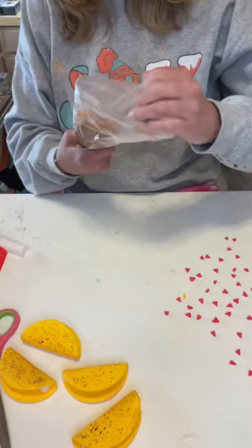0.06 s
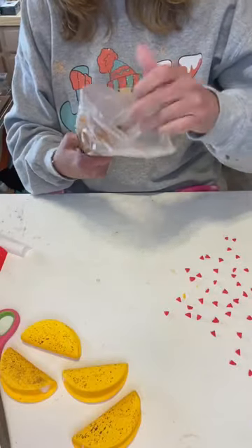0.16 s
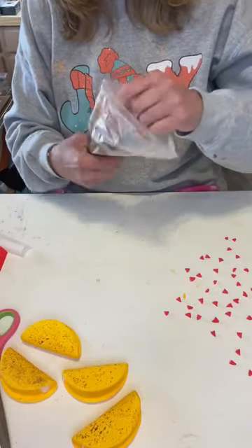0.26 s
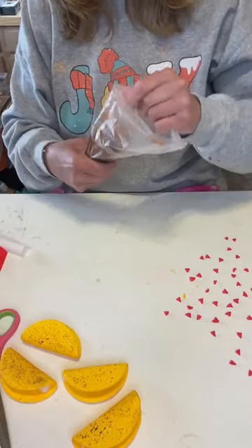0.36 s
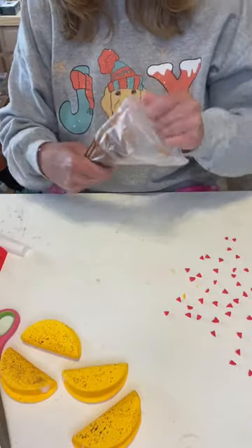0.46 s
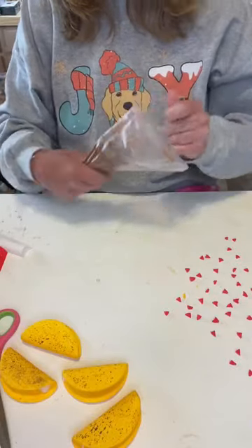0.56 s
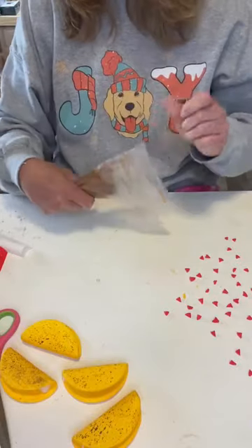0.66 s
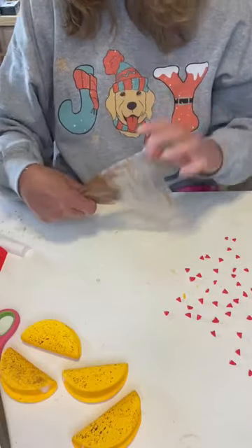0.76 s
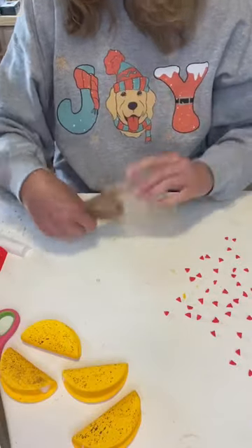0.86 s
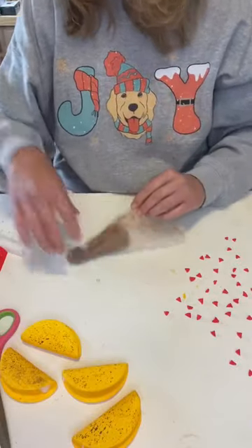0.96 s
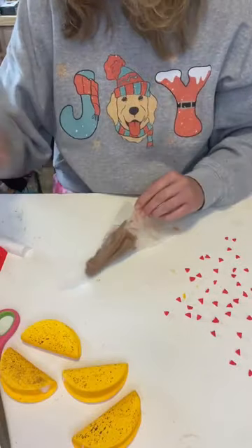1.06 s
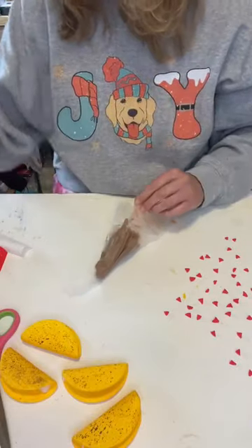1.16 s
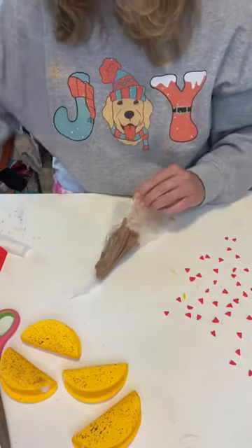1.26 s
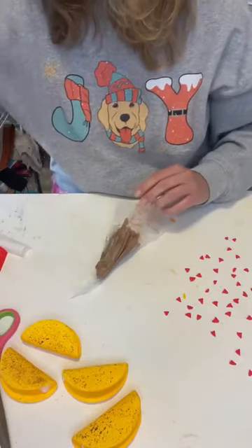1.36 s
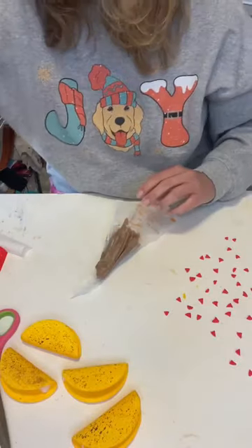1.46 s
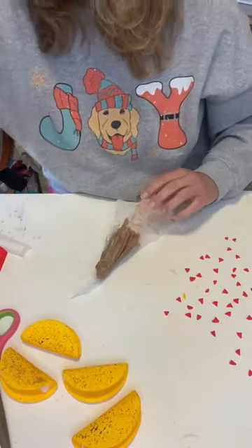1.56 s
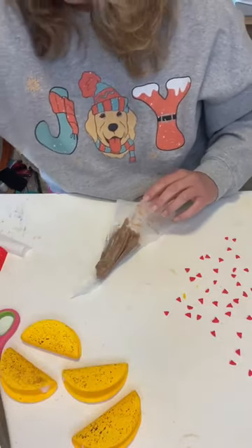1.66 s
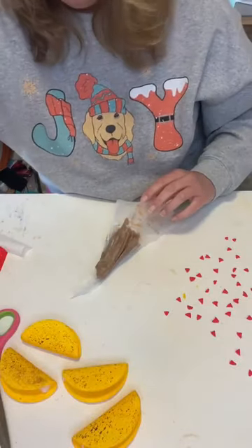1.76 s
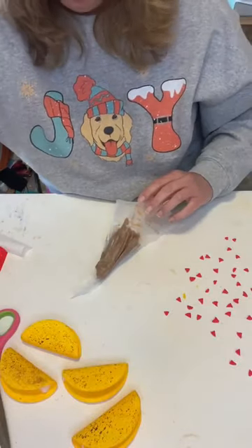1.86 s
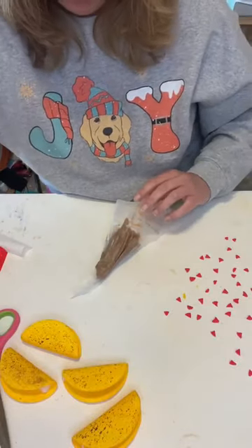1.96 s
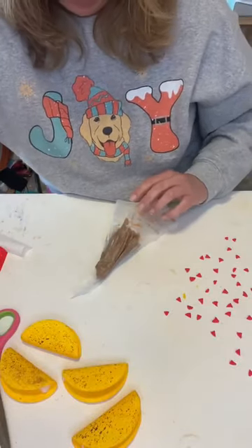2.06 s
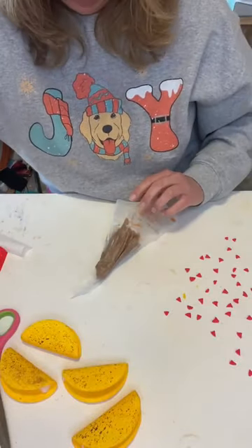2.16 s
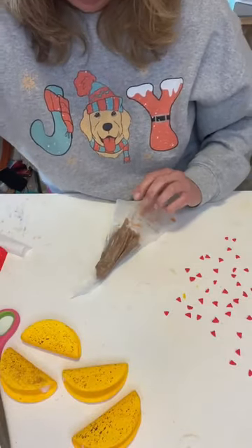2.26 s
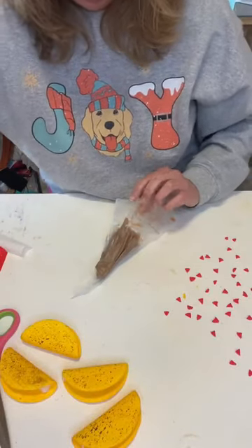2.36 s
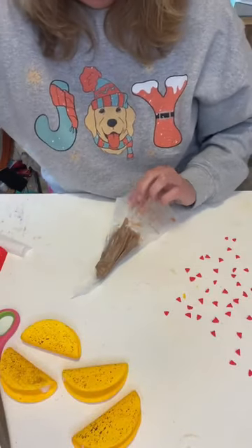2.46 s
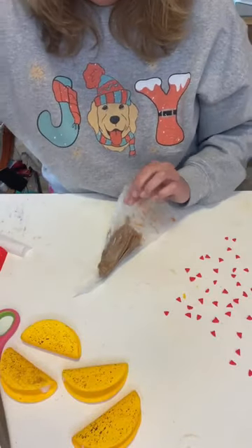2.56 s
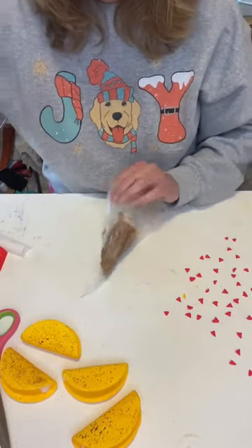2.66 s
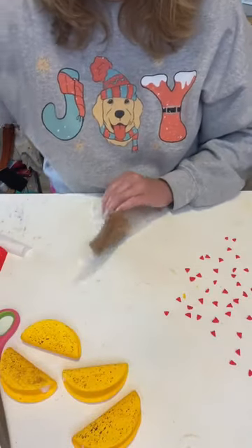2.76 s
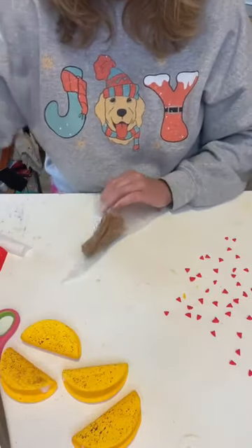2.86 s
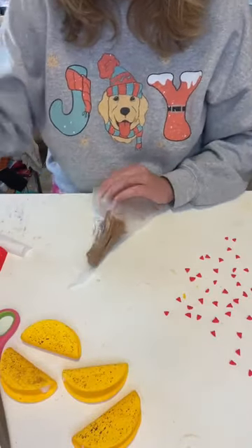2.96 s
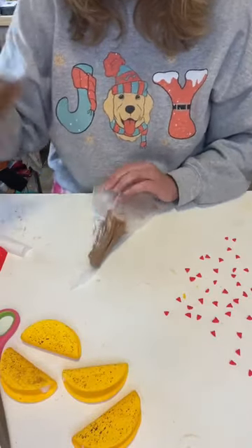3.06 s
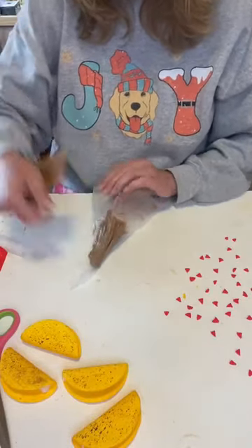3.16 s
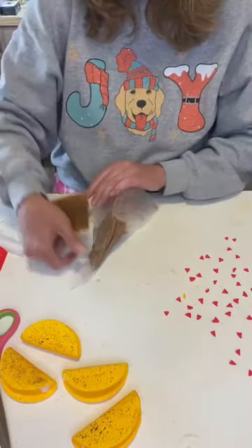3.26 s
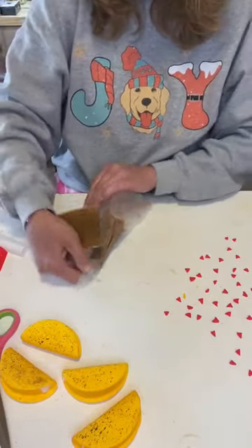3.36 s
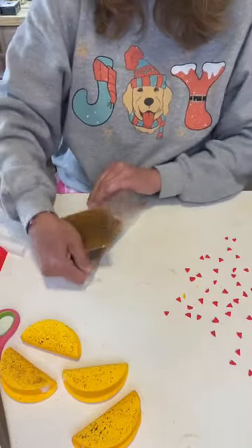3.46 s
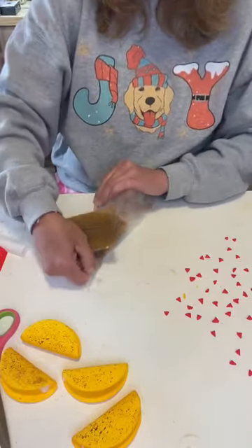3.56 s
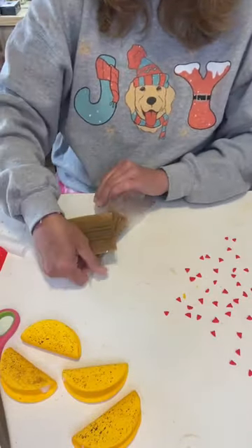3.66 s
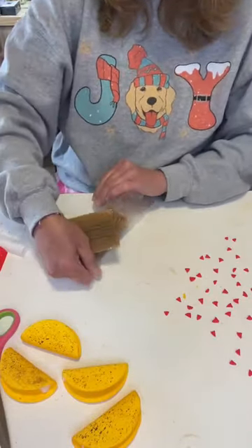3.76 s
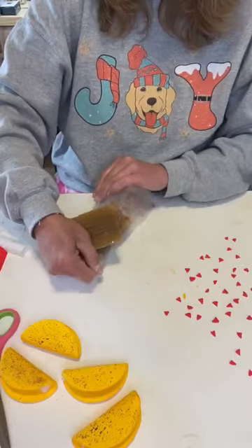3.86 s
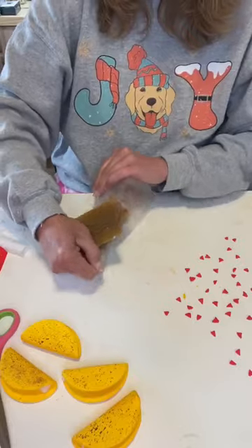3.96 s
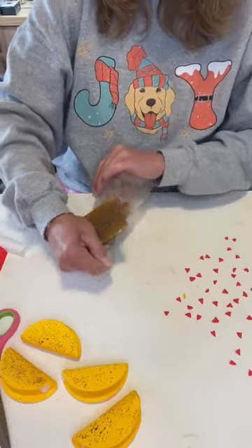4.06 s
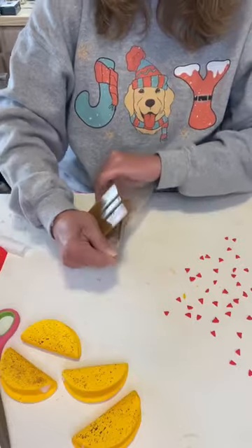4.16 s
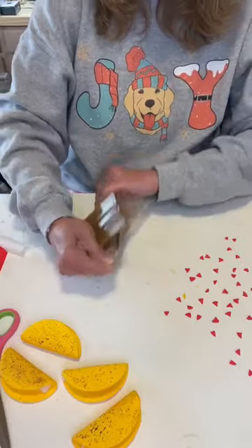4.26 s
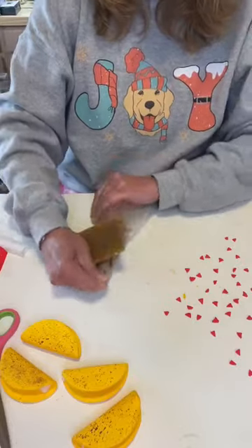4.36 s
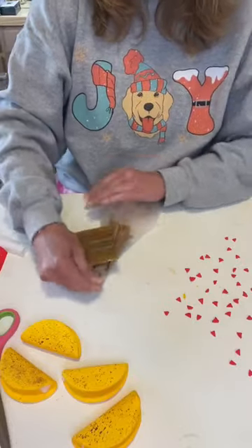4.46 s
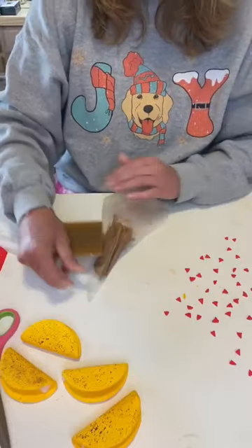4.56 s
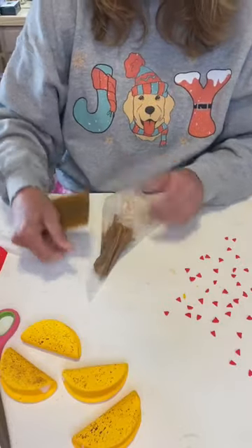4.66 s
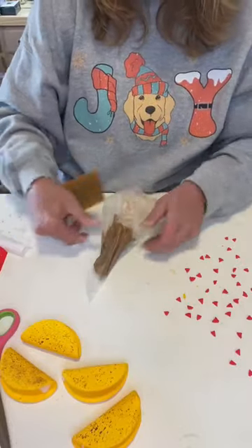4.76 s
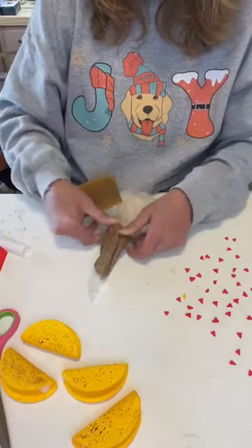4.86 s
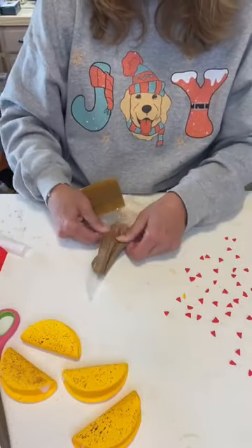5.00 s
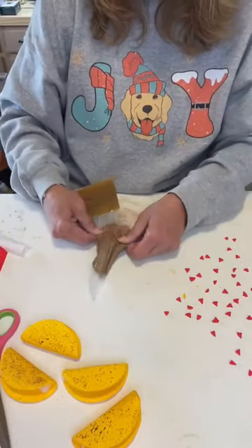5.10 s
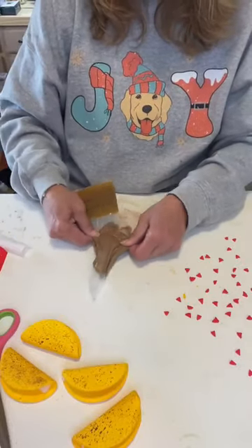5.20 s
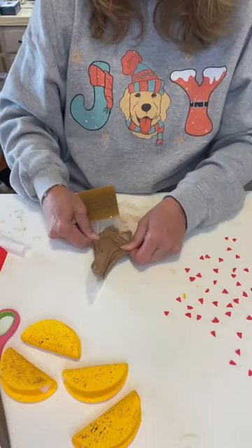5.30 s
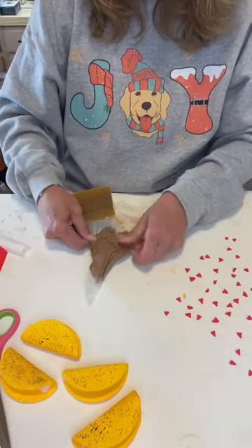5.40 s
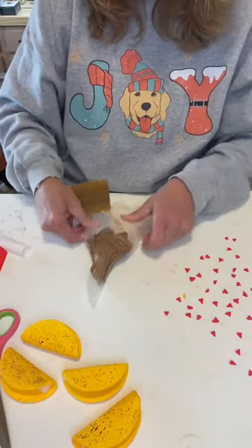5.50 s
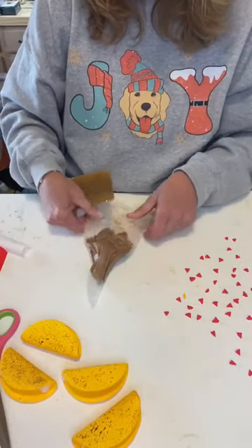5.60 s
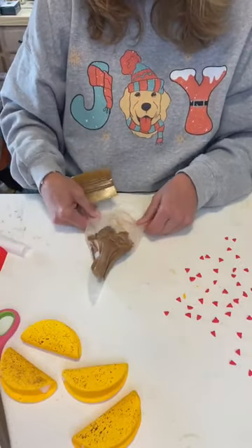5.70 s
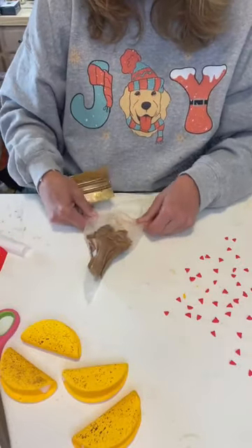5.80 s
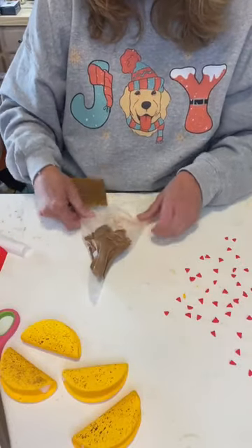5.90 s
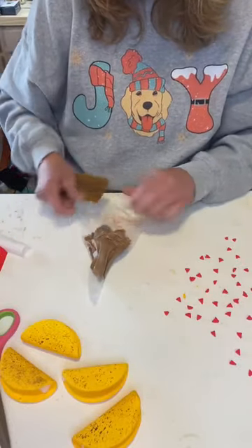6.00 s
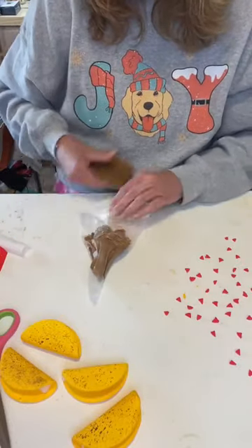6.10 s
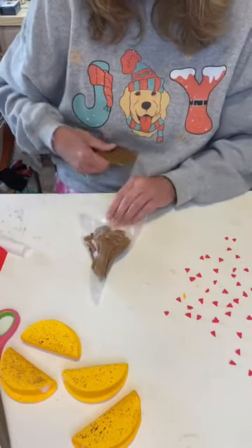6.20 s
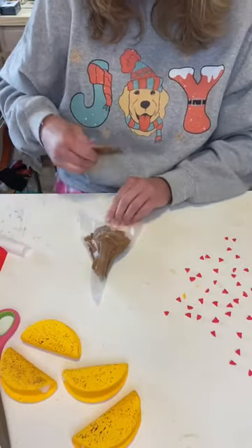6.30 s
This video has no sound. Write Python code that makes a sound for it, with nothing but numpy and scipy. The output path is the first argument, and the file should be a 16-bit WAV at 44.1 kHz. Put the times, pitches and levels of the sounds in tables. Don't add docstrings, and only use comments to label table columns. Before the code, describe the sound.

Crisp plastic film crinkles over a craft table, recorded near and dry by a phone. Busy rustling and popping folds come first, then a brief lull with tiny crackles, then a few sudden snaps. Pressing strokes follow, with rougher crackle and dull thumps on the table top, then more tugging and rustling that fades. Stiff edges tick high; hands rub softly underneath; the quiet room adds only a faint hush.

```python
import sys
import numpy as np
from scipy import signal
from scipy.fft import rfft, irfft, next_fast_len
from scipy.io import wavfile
from scipy.ndimage import uniform_filter1d

SR = 44100
rng = np.random.default_rng(int(sys.argv[2]) if len(sys.argv) > 2 else 0)


def store_wav(level_fs):
    pcm = np.round(np.clip(np.atleast_2d(level_fs), -1, 1) * 32767)
    wavfile.write(sys.argv[1], SR, pcm.T.astype(np.int16))


def nominal_scale(level):
    x = np.asarray(level, float) / 20
    return 10 ** x


N = 279594


def at_hz(points, hz):
    points = np.array(points)
    return np.interp(np.log(hz), np.log(points[:, 0]), points[:, 1])


def in_time(rows):
    s, *columns = np.transpose(rows)
    return [np.interp(np.arange(N) / SR, s, column) for column in columns]


def rms_one(x):
    return x / np.sqrt(np.mean(x ** 2) + 1e-20)


def drift(rate):
    r = np.exp(-80 * np.pi * rate / SR)
    noise = rng.standard_normal(N // 40 + 2002)
    slow = signal.lfilter([1], [1, -2 * r, r * r], noise)[2000:]
    return np.interp(np.arange(N) / 40, np.arange(len(slow)), rms_one(slow))


def ring(clicks, hz, t60):
    r, w = nominal_scale(-60 / (t60 * SR)), 2 * np.pi * hz / SR
    return signal.lfilter([0, np.sin(w)], [1, -2 * r * np.cos(w), r * r], clicks + 1e-18)


def colour(x, gain):
    size = next_fast_len(N)
    hz = np.maximum(np.arange(size // 2 + 1) * SR / size, 1)
    return irfft(rfft(x, size) * gain(hz), size)[..., :N]


# f/Hz, level/dB [dB per Hz]
ROOM_SPECTRUM = [(30, -17), (60, 2.5), (130, -8.5), (300, -0.5), (600, -9.5), (1000, -18), (1600, -8),
                 (2400, -9), (3500, -29), (6000, -25), (13500, -34.5)]


def room_tone():
    level = nominal_scale(-75.5 + 2.6 * drift(14))
    noise = rng.standard_normal(N)
    return level * rms_one(colour(noise, lambda hz: nominal_scale(at_hz(ROOM_SPECTRUM, hz))))


# t/s, peak level/dB, extra level of the upper modes/dB
BUMPS = [(0.066, -53, 0.1), (0.447, -60, -1), (1.09, -56, -2), (1.134, -60, 7), (2.667, -72, 4),
         (3.48, -56, 7.5), (3.499, -51.5, 5.5), (4.471, -38, 1), (4.481, -31.5, -9), (4.973, -58, -2),
         (5.373, -38.5, -9.5), (5.868, -43.5, -13), (6.061, -59, -6), (6.314, -50, 0.5)]
# f/Hz, level/dB, t60/s
TABLE_MODES = [
    (74.2, 2.5, 0.16),
    (134.7, 12.5, 0.11),
    (165, 1.5, 0.17),
    (233, -3.5, .06),
    (380, -20.5, 0.076),
]
# t/s, level/dB
RUBBING = [(0.0, -63), (0.25, -55), (0.42, -66), (0.58, -55), (0.95, -76), (1.3, -63), (1.7, -76),
           (1.95, -66), (2.15, -78), (2.4, -58), (2.95, -78), (3.13, -64), (3.3, -80), (3.9, -66),
           (4.6, -64), (5.2, -82), (5.5, -57), (6.34, -72)]


def table(contact_s, rub_db):
    s, db, upper_db = np.transpose(BUMPS)
    rub = nominal_scale(in_time(RUBBING)[0] + 1.5 * drift(6.8))
    push = np.hanning(int(contact_s * SR))
    push = push / push.sum()
    bumps, rubbing = np.zeros(N), 0
    for hz, mode_db, t60 in TABLE_MODES:
        clicks = np.zeros(N)
        clicks[(s * SR).astype(int)] = nominal_scale(db + mode_db - 7 + upper_db * (hz > 100))
        bumps += ring(np.convolve(clicks, push)[:N], hz, t60)
        rubbing = rubbing + nominal_scale(mode_db) * rms_one(ring(rng.standard_normal(N), hz, t60 / 3))
    return bumps + nominal_scale(rub_db) * rub * rms_one(rubbing)


def echoes(x, t60, gap_s):
    t = np.arange(SR // 2) / SR
    answer = rng.standard_normal(len(t)) * nominal_scale(-60 * t / t60) * (t > gap_s)
    return signal.fftconvolve(x, answer / np.sqrt(np.sum(answer ** 2)))[:N]


# t/s, crackle level/dB, hold/s, settling/s [per 20 dB], crispness/dB
BUCKLES = [(0.4, -45, .025, .04, 3), (0.976, -58, .01, .1, -5), (1.784, -57, .003, .07, 1.2),
           (1.888, -70, .03, .1, -4), (2.112, -69, .09, .05, -8), (2.279, -44, .003, .1, -5),
           (2.371, -36, .003, .06, -4), (2.666, -41, .11, .25, -1), (2.877, -37.5, .05, .17, -1),
           (3.401, -69, .003, .045, -8), (3.545, -42, .11, .07, 1.2), (4.077, -42, .012, .1, 4),
           (4.196, -51, .06, .1, 2.4), (4.763, -49.5, .02, .045, -1.4), (4.83, -65, .04, .065, -1.4),
           (4.973, -69, .003, .06, -9), (5.029, -47, .03, .1, -2.2), (5.061, -41, .1, .5, 0.2),
           (5.779, -49, .03, .1, 0.2), (6.2, -62, .02, .12, -1.2), (6.306, -52, .05, .1, 1.2)]
# peak t/s, crackle level/dB, rise/s [per 20 dB],
# fall/s [per 20 dB], crispness/dB
SQUEEZES = [(0.162, -34.5, .29, .12, -0.4), (0.265, -44, .2, .1, 1.4), (0.338, -50, .1, .05, 2.4),
            (0.461, -40, .05, .2, -1.2), (0.521, -38.5, .15, .22, 0.4), (0.759, -41, .13, .04, -1.2),
            (0.81, -51, .08, .11, 0.4), (1.041, -43.5, .075, .05, 1.4), (1.107, -31.5, .07, .13, 1.2),
            (1.24, -48, .07, .055, 3), (1.31, -55, .04, .07, 2.4), (1.409, -53, .13, .13, 3),
            (1.495, -64, .2, .025, -4), (1.595, -72, .03, .04, -14), (1.95, -64.5, .12, .05, -11),
            (2.022, -58.5, .05, .075, -2.2), (2.272, -51, .08, .05, -2.2), (2.4, -47, .04, .08, -6),
            (2.465, -51, .05, .1, 0.6), (2.658, -50, .27, .05, 0.4), (3.06, -47, .1, .13, -4),
            (3.165, -51, .5, .075, 6),
            (3.478, -49, .018, .09, -6), (3.757, -43, .085, .2, 1.2), (3.96, -46, .35, .4, 0.4),
           (4.296, -43, .05, .12, 3), (4.495, -40, .13, .2, 0.4), (4.588, -44.5, .15, .15, -2.4),
           (4.73, -55, .12, .1, -0.4), (5.355, -40.5, .2, .07, -3), (5.43, -48, .1, .15, -3),
           (5.485, -46.5, .03, .06, -0.4), (5.552, -52, .05, .15, -4), (5.739, -57.5, .04, .1, -6),
           (5.842, -35, .09, .1, 1.2), (5.92, -38, .15, .14, 5), (6.068, -44.5, .2, .115, 3)]


def handling():
    masking = 1.8
    rise_bend, fall_bend = 1.2, 1.15
    moves = [(s, db, .003, hold, fall, c) for s, db, hold, fall, c in BUCKLES]
    moves += [(s, db, rise, 0, fall, c) for s, db, rise, fall, c in SQUEEZES]
    t = np.arange(0, N + 32, 32) / SR
    weight, crisp = nominal_scale(-300), 0
    for s, db, rise, hold, fall, crisp_db in moves:
        before = np.maximum(s - t, 0) / rise
        after = np.maximum(t - s - hold, 0) / fall
        move_db = db - 20 * before ** rise_bend - 20 * after ** fall_bend
        move = nominal_scale(2 * masking * (move_db + 45))
        weight = weight + move
        crisp = crisp + crisp_db * move
    level_db = 10 * np.log10(weight) / masking - 45
    return in_time(np.transpose([t, level_db, crisp / weight]))


# f/Hz, level/dB [dB per Hz]
FILM = [(150, -34), (250, -26), (500, -21), (900, -9), (1300, -9), (1900, -4), (3200, -7), (4800, -0.5),
        (7000, -1.5), (8800, -0.5), (11000, -8.5), (13200, -23)]
# t/s, f/Hz, lift level/dB, rim level/dB
GRIP = [(0.1, 2300, 12, -0.4), (.5, 2350, 6, -0.4), (.8, 2200, 6, 3), (1.1, 2000, 3.5, -1.2),
        (1.3, 1880, 5, -1.5), (1.7, 2200, 6, -4), (1.95, 1600, 12, -3), (2.35, 2200, 5, -2.2),
        (2.7, 1630, 3.4, -3.4), (3.1, 1650, 6, 1.4), (3.5, 1750, 2.4, 2.4), (4.05, 2000, 1.4, -2.4),
        (4.5, 1750, 5, -0.4), (4.8, 1900, 3.5, -2.2), (5.3, 1950, 4, 4), (5.56, 1770, 4.5, 0.4),
        (5.85, 2050, 4, 5), (6.34, 2000, 2.4, -0.4)]


def crackle(per_s, thinning, spread_db, cycles, clump_db, patchy_db, grip_width):
    rim_hz, rim_width = 3420, .2
    level_db, crisp_db = handling()
    effort_db = np.maximum(level_db + 45, -35)
    large_db = -12.2 - .13 * effort_db - .6 * crisp_db
    small_db = 0.2 + .1 * effort_db + 1.05 * crisp_db
    finest_db = -7.5 + .3 * effort_db + 1.05 * crisp_db

    busy = nominal_scale(thinning * (effort_db - 3))
    sizes = nominal_scale(spread_db * np.minimum(rng.exponential(1, N), 3.5))
    sizes = sizes * rng.choice([-1, 1], N) / np.sqrt(busy)
    born = rng.random(N) < per_s * busy * nominal_scale(clump_db * drift(50)) / SR
    pitches = np.geomspace(200, 13000, 32)
    odds = np.cumsum(pitches) / np.sum(pitches)
    dealt = np.searchsorted(odds, rng.random(N) ** 1.6)

    grip_hz, lift_db, rim_db = (curve[::16] for curve in in_time(GRIP))
    groups = np.zeros((4, N))
    for k, hz in enumerate(pitches):
        gain_db = at_hz(FILM, hz) + patchy_db * min(1, hz / 1500) * drift(8.8)[::16]
        gain_db += lift_db * np.exp(-((np.log(hz) - np.log(grip_hz)) / grip_width) ** 2)
        gain_db += rim_db * np.exp(-(np.log(hz / rim_hz) / rim_width) ** 2)
        gain = nominal_scale(gain_db).repeat(16)[:N] * np.sqrt(hz)
        creases = rms_one(ring(sizes * born * (dealt == k), hz, cycles / hz))
        groups[np.searchsorted([1200, 4000, 9000], hz)] += gain * creases
    large, middle, small, finest = (rms_one(group) for group in groups)

    level = nominal_scale(level_db) / np.sqrt(1 + nominal_scale(2 * small_db))
    return level * (middle + nominal_scale(large_db) * large + nominal_scale(small_db) * small + nominal_scale(finest_db) * finest)


# t/s, peak level/dB, f/Hz, treble level/dB [re peak]
FOLD_SNAPS = [(0.743, -34, 1300, -10), (0.975, -42, 2080, -14), (1.0036, -37, 1640, -13),
              (1.0797, -25, 1890, -7.5), (1.227, -31, 1860, -6), (1.313, -37, 2140, -6),
              (1.383, -45, 1890, -1), (1.5808, -50, 2080, -26), (1.7844, -36, 2390, -15),
              (1.8874, -52, 1700, 3), (2.0053, -41.5, 1540, -18), (2.371, -23, 2250, -12),
              (2.4602, -42, 1750, -15), (2.5596, -45, 1600, -15), (2.794, -36, 1620, -6),
              (2.8793, -23.5, 1720, -9), (3.05, -29, 1640, -17), (3.4012, -50, 1870, -28),
              (4.0372, -35, 2010, -4), (4.196, -35, 2040, -10), (4.4596, -27.5, 1734, -14.5),
              (4.4904, -21, 1720, -9), (4.9698, -48, 1840, -22), (5.0595, -24.5, 1870, -15),
              (5.2458, -33, 1900, -8), (5.445, -36, 1410, -16), (5.5498, -40, 1730, -16),
              (5.7808, -42, 2240, -11.5), (6.202, -46, 1370, -10.5), (6.3087, -47, 1690, -5)]
# t/s, peak level/dB, f/Hz
RIM_SNAPS = [(0.3382, -29.5, 3900), (0.403, -30, 3600), (0.4379, -31, 2770), (1.028, -30, 4340),
             (1.1034, -25, 3590), (1.712, -56, 2600), (2.246, -42, 3040), (2.2766, -30, 3420),
             (2.6664, -24.5, 3620), (3.4735, -35, 3170), (3.5508, -33, 3230), (3.7394, -38, 3540),
             (3.913, -38.5, 3030), (4.278, -32, 4230), (4.3906, -36, 3340), (4.7651, -32, 4780),
             (4.786, -30.5, 3580), (5.8072, -27, 3570), (5.8363, -27, 3450), (6.043, -37, 3030)]


def snaps(cycles, crack_s, tail_s):
    rim_treble_db, rattle_db = -13, -21
    events = [*FOLD_SNAPS, *((s, db, hz, rim_treble_db) for s, db, hz in RIM_SNAPS)]
    out, t = np.zeros(N + 4096), np.arange(4096) / SR
    for s, db, hz, treble_db in events:
        crack, rattle = rng.standard_normal((2, 4096))
        body = ring(crack * np.exp(-t / crack_s), hz, cycles / hz)
        bright = np.diff(crack, prepend=0) * np.exp(-t / crack_s)
        after = ring(rattle, hz, 2.4 / hz) + nominal_scale(treble_db + 14) * np.diff(rattle, prepend=0)
        after = after * np.exp(-t / tail_s)
        pop = body / np.abs(body).max() + nominal_scale(treble_db - 6) * bright + nominal_scale(rattle_db) * after
        out[round(s * SR):][:4096] += nominal_scale(db - 11.0) * pop
    return out[:N]


# f/Hz, width/Hz, lift level/dB
POCKETS = [
    (499, 32, 5),
    (901, 22, 6),
    (1610, 150, 2.5),
    (3170, 470, 3.5),
    (6920, 860, 2),
]


def air_pockets(x):
    out = x.copy()
    for hz, width, db in POCKETS:
        r = np.exp(-np.pi * width / SR)
        poles = [1, -2 * r * np.cos(2 * np.pi * hz / SR), r * r]
        peak = signal.lfilter([(1 - r * r) / 2, 0, (r * r - 1) / 2], poles, x)
        out += (nominal_scale(db) - 1) * peak
    return out


def scene():
    tone = room_tone()
    bumps = table(contact_s=0.0054, rub_db=-8.5)
    creases = crackle(per_s=15000, thinning=.35, spread_db=2.0, cycles=14.3,
                      clump_db=2.0, patchy_db=2.5, grip_width=0.16)
    pops = snaps(cycles=31.0, crack_s=0.0023, tail_s=0.015)
    bag = air_pockets(nominal_scale(-2.5) * creases + pops)
    turn = 1.66 * drift(3.46)
    room = echoes(bag * np.cos(turn), t60=0.077, gap_s=.0015)
    room += echoes(bag * np.sin(turn), t60=0.089, gap_s=0.001)
    mid = bag + nominal_scale(-6) * room + tone + bumps
    return np.array([mid, mid])


WIDE_EDGES = [4100, 4800, 5600, 6500, 7600, 9000, 11300, 12900]
# side level/dB [re mid], share of frames [0-1]
WIDE_BANDS = [(-10.5, .33), (-2.5, .6), (-5, .74), (-3.2, .87), (-3, .9), (-2.6, .9), (-9, 0.69)]
MONO_STARTS = [0.335, 0.735, 0.83, 1.075, 1.255, 1.285, 1.36, 1.41, 1.505, 1.815, 1.94, 1.99, 2.03, 2.465,
               2.535, 2.665, 2.785, 3.225, 3.54, 3.72, 4.28, 4.56, 4.755, 4.955, 5.02, 5.46, 5.535, 5.705,
               6.05, 6.195]


def widen(mid):
    frame_size, frame_start, mono_hold_s = 1024, 997, .036
    t = np.arange(N) / SR
    frame = (np.arange(N) + frame_size - frame_start) // frame_size
    frames = N // frame_size + 2
    unrelated = mid * rms_one(signal.lfilter([1], [1, -.95], rng.standard_normal(N)))
    luck = rng.random(frames)[frame]
    for s in MONO_STARTS:
        luck[(t > s) & (t < s + mono_hold_s)] = 1
    side = np.zeros(N)
    for low, high, (db, share) in zip(WIDE_EDGES, WIDE_EDGES[1:], WIDE_BANDS):
        band = colour(unrelated, lambda hz: (hz > low) & (hz <= high))
        skipped = rng.random(frames)[frame] < .1
        is_open = 1. * ((luck < share) & ~skipped)
        side += nominal_scale(db) * band * uniform_filter1d(is_open, size=frame_size // 2)
    return side


def band_limit(x):
    return signal.sosfilt(signal.butter(12, 14360, fs=SR, output="sos"), x)


# f/Hz, level/dB
TOP_STEPS = [(8900, 0.72), (9100, -1.5), (11200, 0), (11400, -5), (13100, -3), (13200, -71.5)]


def record(dry):
    mid = signal.sosfilt(signal.butter(4, 58, "high", fs=SR, output="sos"), dry[0])
    mid = .15 * np.tanh(mid / .15)
    mid = colour(mid, lambda hz: nominal_scale(at_hz(TOP_STEPS, hz)))
    side = widen(mid)
    return band_limit(np.array([mid + side, mid - side]))


dry = scene()
out = record(dry)
store_wav(out)
```